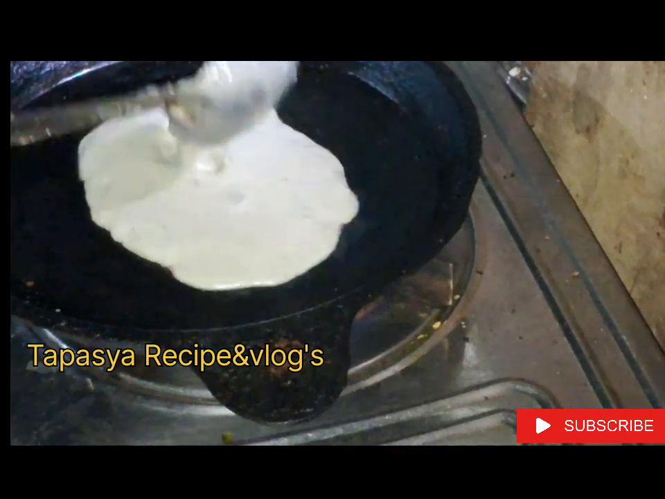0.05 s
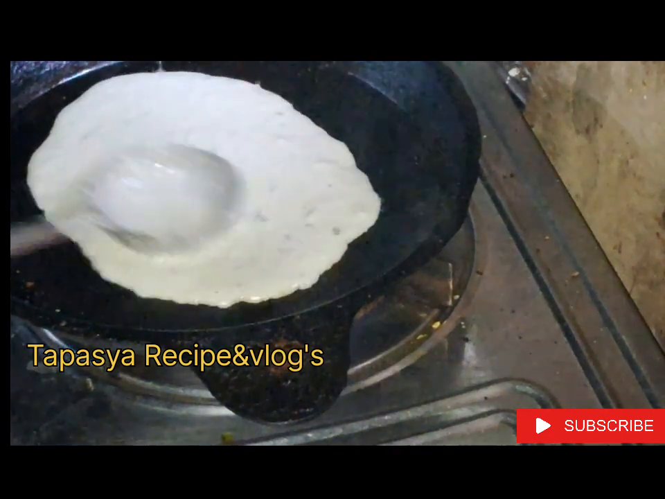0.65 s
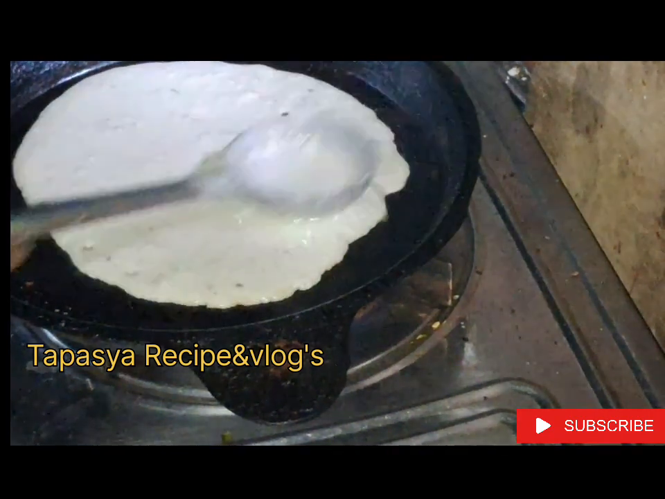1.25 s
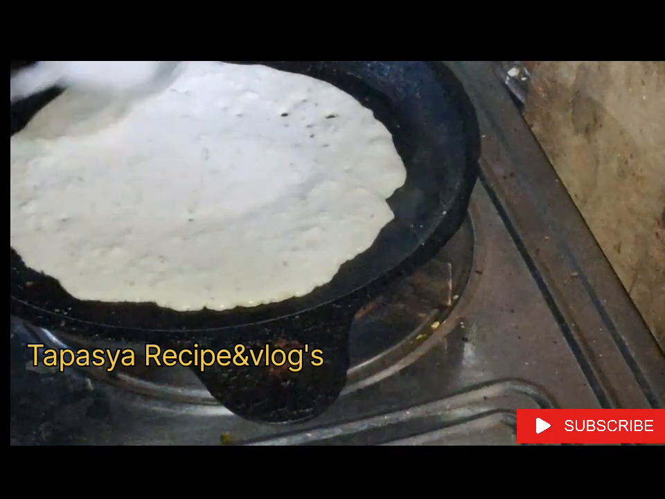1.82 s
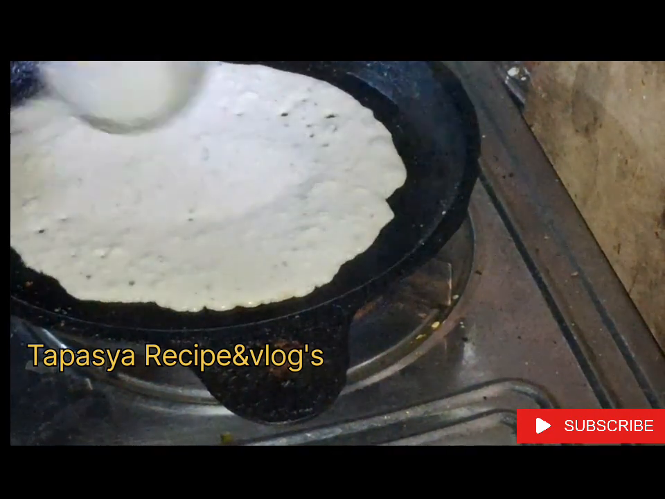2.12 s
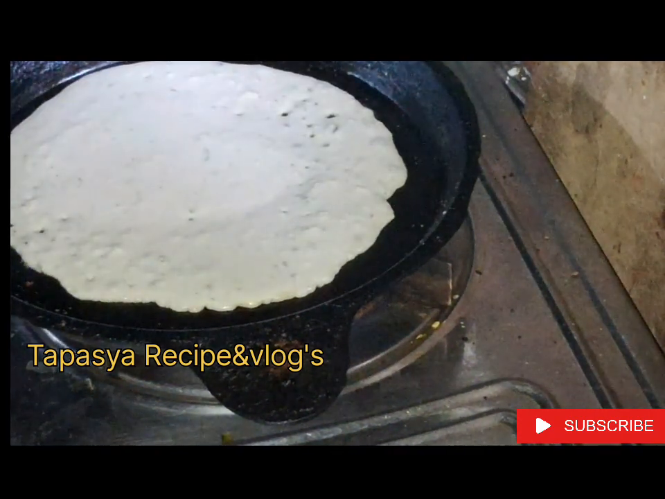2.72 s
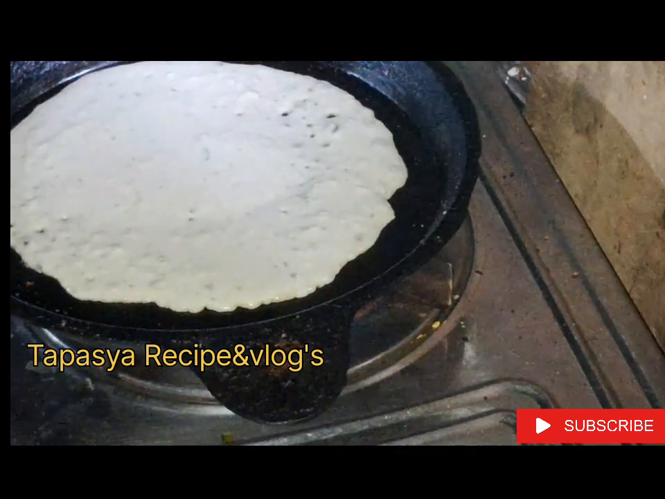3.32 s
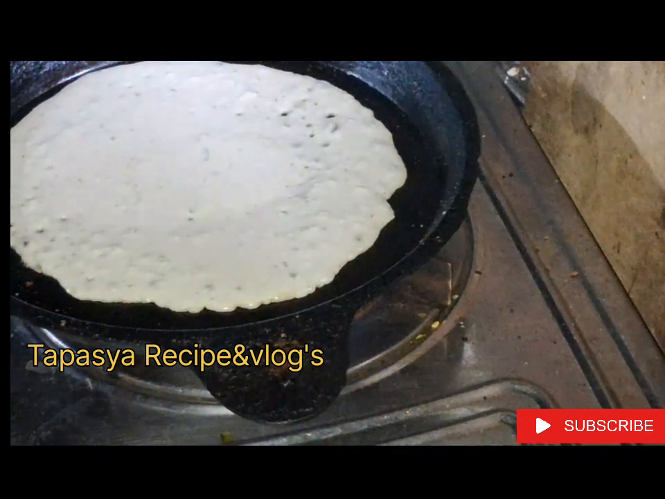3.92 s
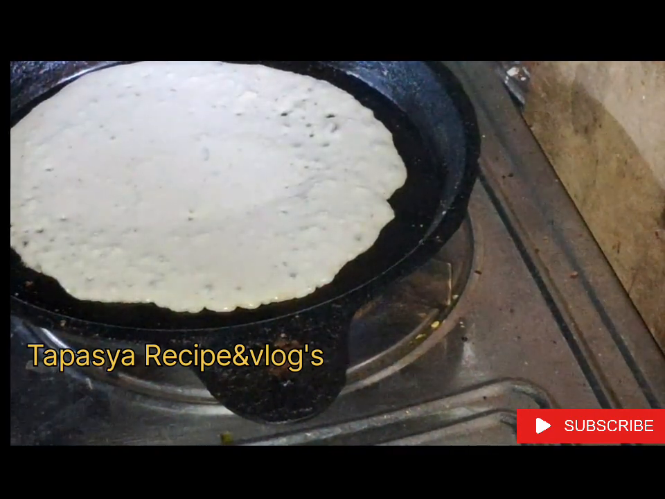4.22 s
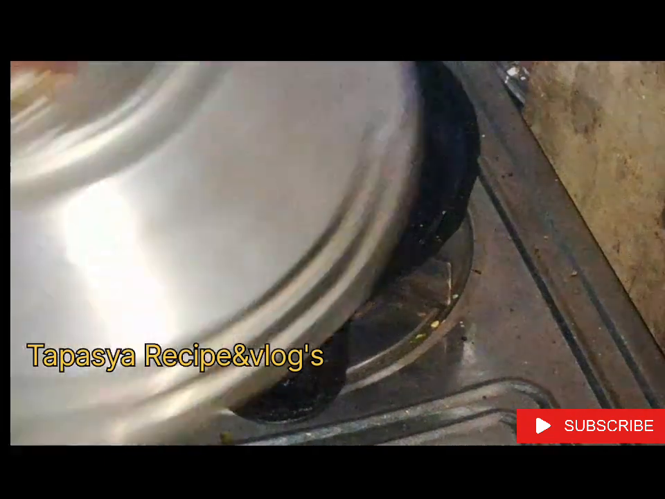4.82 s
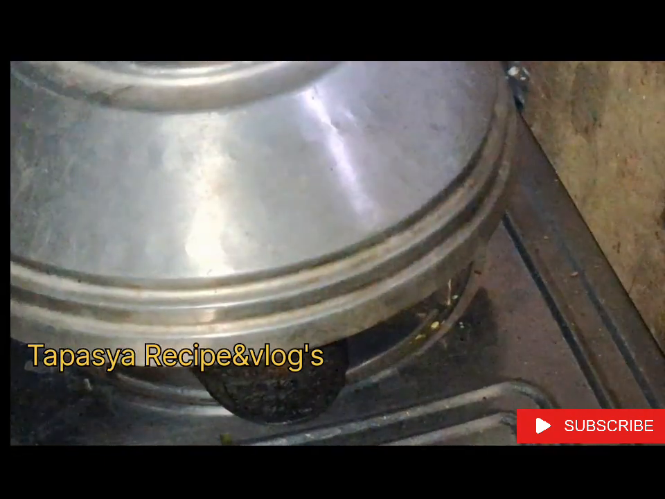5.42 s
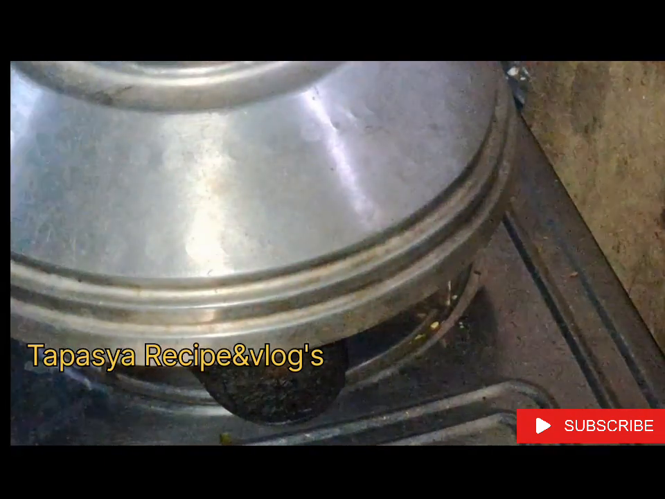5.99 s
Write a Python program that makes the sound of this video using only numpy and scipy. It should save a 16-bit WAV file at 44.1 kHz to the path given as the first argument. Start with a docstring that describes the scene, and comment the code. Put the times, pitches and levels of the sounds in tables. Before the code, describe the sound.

A fine, fizzing sizzle swells several times as batter is poured and spread on a nearby iron griddle, then gradually settles. Off to the left a ladle clinks and a steel lid booms and rattles, with a short kitchen echo. The lid comes down over the pan with a hollow knock, and the frying turns quieter and more hollow, with a few small plops.

```python
"""A small, hard-walled kitchen: batter is ladled and spread on a hot iron griddle. Each stroke wets fresh
iron, and thousands of tiny bursting bubbles fizz, spit and boil, dying down as the batter sets.
Off to the left the ladle is put down with a clink and a steel lid is picked up with a boom and a clatter.
The lid lands on the pan with a hollow knock, and the sizzle goes on, ringing in the cavity under it."""
import sys
import numpy as np
from scipy import signal
from scipy.fft import rfft, irfft, next_fast_len
from scipy.io import wavfile

SR = 44100
rng = np.random.default_rng(int(sys.argv[2]) if len(sys.argv) > 2 else 0)


def waveform_to_disk(signal):
    """Save audio, clipped to [-1, 1], as 16-bit WAV at the path in sys.argv[1]."""
    frames = np.transpose(np.atleast_2d(signal))
    scaled = np.clip(frames, -1, 1) * 32767
    samples = np.round(scaled).astype(np.int16)
    wavfile.write(sys.argv[1], SR, samples)


N = 271215
TIME = np.arange(N) / SR

# the pour, then each sweep of the ladle: (start [s], length [s], steam [dB], churning [dB])
STROKES = [(-.06, 0.33, -21, -38.5), (0.686, 0.22, -32, -42), (1.056, .13, -26, -33.5),
           (1.465, 0.15, -28, -40)]
# tone of boiling batter: (frequency [Hz], level [dB])
BUBBLING_SPECTRUM = [(40, -42), (90, -21), (130, -13), (175, -6.5), (225, -11), (330, -15.5), (400, -5),
                     (620, 0.5), (830, 1.5), (1200, 2.5), (1550, 3.5), (2300, -4.5), (3200, -10),
                     (6000, -18.5), (12000, -59)]


def amp(db):
    """Decibels to gain."""
    return 10 ** (np.asarray(db) / 20)


def unit_rms(x):
    """Scales to rms 1."""
    return x / np.sqrt(np.mean(x ** 2) + 1e-20)


def curves(rows):
    """Turns (time, values...) breakpoints into one curve per value."""
    times, *columns = np.transpose(rows)
    return [np.interp(TIME, times, column) for column in columns]


def coloured(x, spectrum):
    """Equalises a signal along a log-frequency curve, at rms 1."""
    size = next_fast_len(x.shape[-1])
    hz, db = np.transpose(spectrum)
    gain = amp(np.interp(np.log(np.fft.rfftfreq(size, 1 / SR) + 1), np.log(hz + 1), db))
    return unit_rms(irfft(rfft(x, size) * gain, size)[..., :x.shape[-1]])


def add(mix, start, sound):
    """Mixes a sound in at `start` seconds."""
    part = mix[round(start * SR):][:len(sound)]
    part += sound[:len(part)]


def resonate(x, hz, width):
    """A resonance of gain 1 that follows the curve hz."""
    turn = np.exp(2j * np.pi * np.cumsum(hz) / SR)
    pole = np.exp(-np.pi * width / SR)
    return 2 * (turn * signal.lfilter([1 - pole], [1, -pole], x / turn)).real


def room(x, early_db, late_db, early_t60=0.092, late_t60=0.46, shared_hz=330):
    """Dense echoes from the stove and near walls, then the kitchen's tail; bass is alike in both ears."""
    t = np.arange(SR * 3 // 5) / SR
    near, far = rng.standard_normal((2, 2, len(t))) * (rng.random((2, 2, len(t))) < .2)
    near = unit_rms(near * amp(-60 * t / early_t60) * (t > .001))
    far = unit_rms(far * amp(-60 * t / late_t60) * (1 - np.exp(-t / 0.0025)))
    left, right = rfft((amp(early_db) * near + amp(late_db) * far) / np.sqrt(len(t)))
    shared = 1 / (1 + (np.fft.rfftfreq(len(t), 1 / SR) / shared_hz) ** 4)
    echoes = irfft(np.array([left, shared * left + np.sqrt(1 - shared ** 2) * right]))
    return signal.oaconvolve(np.atleast_2d(x), echoes, axes=1)[:, :N]


def from_left(x, far_ear_db, lag_samples=16):
    """The right ear hears it later and weaker."""
    return np.array([x, amp(far_ear_db) * np.pad(x, (lag_samples, 0))[:N]])


def wetting(levels_db, rise_power, dry_s, fall_power):
    """Each stroke swells while it wets fresh iron, then dries off; their energies add."""
    energy = 1e-12
    for (start, length, *_), db in zip(STROKES, levels_db):
        swell = np.clip((TIME - start) / length, 0, 1) ** rise_power
        drying = np.exp(-(np.maximum(TIME - start - length, 0) / dry_s) ** fall_power)
        energy += (amp(db) * swell * drying) ** 2
    return np.sqrt(energy)


def simmering(level_db, fall_db_per_s):
    """The simmer builds with the pour and fades steadily as the batter sets."""
    start, length, *_ = STROKES[0]
    return np.clip((TIME - start) / length, 0, 1) * amp(level_db - fall_db_per_s * TIME)


def bursts(per_s, spread_db, candidates=60000):
    """Tiny bubbles burst all over the pan, each with its own size and delay between the ears."""
    out = np.zeros((2, N))
    when, side, chance, sign, size = rng.random((candidates, 5)).T
    at = (when * (N - 1)).astype(int)
    lag = np.round((side - .5) * 20).astype(int)
    size = np.sign(sign - .5) * amp(spread_db * np.minimum(-np.log(size + 1e-9), 6))
    size *= chance < per_s[at] * N / SR / candidates  # the rate decides which ones burst
    np.add.at(out[0], at, size)
    np.add.at(out[1], (at + lag) % N, size)
    return unit_rms(out / np.sqrt(per_s))


def frying(spectrum, per_s, spread_db, hiss_db):
    """Separate bursts and their echoes over a smooth hiss of steam."""
    pops = bursts(per_s, spread_db)
    pops = unit_rms(pops + room(pops, early_db=0, late_db=-1.5))
    return coloured(pops + amp(hiss_db) * rng.standard_normal((2, N)), spectrum)


def steam_level(steam_db):
    """Envelope of the fizz: strokes, simmer and flares, ducked as the lid comes between pan and ears."""
    # a wet spot flares up: (time [s], level [dB])
    flares = [(1.06, -27.5), (1.44, -25.5), (1.86, -32), (2.063, -35), (2.345, -35.5), (2.725, -35.5),
              (4.78, -47), (5.68, -44.5)]
    flaring = sum(amp(db) * np.exp(-((TIME - middle) / 0.033) ** 2) for middle, db in flares)
    stirred = wetting(steam_db, rise_power=0.39, dry_s=.7, fall_power=1.6)
    shade_db = np.interp(TIME, (4.35, 4.9), (0, -4))
    steam = np.hypot(stirred, simmering(-37.5, fall_db_per_s=.65)) * amp(shade_db)
    return np.hypot(steam, flaring)


def fizzing(per_s):
    """Steam escapes in a bright, fine fizz."""
    # its airy tone: (frequency [Hz], level [dB])
    spectrum = [(400, -33.5), (1500, -7), (3000, -5), (5000, -5), (7200, -8), (8500, -1.5), (9400, -3),
                (11000, -1), (13000, 2.5), (16000, -5)]
    return frying(spectrum, per_s, spread_db=4.0, hiss_db=0.0)


def spitting(churn_db, pressed, per_s):
    """Churned batter spits; the gap under the ladle's bowl colours it, most when pressed down."""
    # midrange bite of the spitting: (frequency [Hz], level [dB])
    spectrum = [(300, -34), (1100, -3), (1600, -14), (2150, 2.5), (2800, 1), (3300, 2), (4100, 2),
                (5400, -2.5), (7500, -4.5), (16000, -40)]
    # the gap's lowest resonance: (time [s], pitch [Hz], gain [dB])
    gap_sweep = [(.1, 2780, 8), (.35, 2700, 12.5), (.7, 1700, 11), (1.05, 1890, -2), (1.21, 2120, 5),
                 (1.31, 1520, 11.5), (1.44, 1500, 11), (1.53, 1740, 0), (1.85, 2010, 10)]
    # its resonances: (multiple of the lowest, width [Hz], gain [dB])
    gap_modes = [(1, 300, -2), (1.4, 250, -9), (2.25, 250, -21)]
    level = wetting(churn_db, rise_power=0.66, dry_s=0.48, fall_power=0.92)
    spit = level * frying(spectrum, per_s, spread_db=4.0, hiss_db=-3.5)
    gap_hz, gap_db = curves(gap_sweep)
    gap = sum(resonate(spit, ratio * gap_hz, width) * amp(db) for ratio, width, db in gap_modes)
    return spit + pressed * amp(gap_db) * gap


def sizzle():
    """Strokes stir up fizz, spitting and bubbling over a fading simmer."""
    # the ladle eases off: (middle [s], half length [s], dip [dB])
    lifts = [(1.064, 0.075, -3), (1.565, .055, -4)]
    pressed = amp(sum(db * np.exp(-((TIME - middle) / half) ** 2) for middle, half, db in lifts))
    _, _, steam_db, churn_db = np.transpose(STROKES)
    steam = steam_level(steam_db)
    churned = wetting(churn_db - 3.5, rise_power=0.58, dry_s=0.59, fall_power=0.83)
    boil = np.hypot(churned, simmering(-37, fall_db_per_s=1.94))
    per_s = 8000 * (steam / steam.max()) ** .7  # a quieter pan has fewer bursts
    fizz = steam * fizzing(per_s)
    spit = spitting(churn_db, pressed, per_s / 2)
    bubbling = pressed * boil * frying(BUBBLING_SPECTRUM, per_s / 3, spread_db=3.0, hiss_db=-12.5)
    return fizz + spit + under_lid(bubbling, boil)


def room_tone():
    """A low kitchen rumble common to both ears, and faint moving air at each."""
    # the rumble: (frequency [Hz], level [dB])
    kitchen = [(20, -37), (45, -27), (64, 12.5), (85, -16), (115, 6), (170, -37), (300, -8), (1000, -3),
               (8000, -73)]
    # moving air: (frequency [Hz], level [dB])
    draught = [(20, -29), (60, 4), (130, 4), (220, 0.5), (600, -22), (4000, -43)]
    rumble = amp(-61.0) * coloured(rng.standard_normal(N), kitchen)
    return rumble + amp(-66.0) * coloured(rng.standard_normal((2, N)), draught)


def stirring():
    """The ladle drags through the batter; at each rub the iron's faint hum swells and fades."""
    # the bowl rubs on the iron: (middle [s], length [s], level [dB])
    rubs = [(0.707, 0.92, -57.5), (1.294, 0.66, -54.5), (1.714, 0.4, -51.5), (2.363, 0.2, -62.5),
            (2.743, 0.55, -62)]
    # the iron's hum: (frequency [Hz], level [dB])
    pan_hum = [(60, -19), (170, -2.5), (220, -54), (262, 5), (310, -11.5), (420, -1.5), (900, -36),
               (4000, -60)]
    pressure = sum(amp(db) * np.cos(np.pi * np.clip((TIME - middle) / length, -.5, .5))
                   for middle, length, db in rubs)
    return pressure * coloured(rng.standard_normal(N), pan_hum)


def droplet_snaps(fall_s=0.0012):
    """A droplet bursts on the hot iron with a thin, dry tick."""
    # droplets: (time [s], level [dB])
    snaps = [(2.952, -31.5), (3.7318, -35), (4.2562, -37), (4.564, -37), (4.8019, -37), (5.5792, -40)]
    # tone of a tick: (frequency [Hz], level [dB])
    spectrum = [(1000, -25), (6000, -11), (10000, 0), (16000, -6)]
    out, t = np.zeros(N), np.arange(SR // 50) / SR
    for start, db in snaps:
        add(out, start, amp(db) * coloured(rng.standard_normal(len(t)), spectrum) * np.exp(-t / fall_s))
    return out + room(out, early_db=6, late_db=-8)


def struck(blows, modes, scuff, rise_s, held_s=1, polarity=1):
    """Each blow is a brief rough contact that sets the modes ringing; a hand damps them after held_s."""
    out, t = np.zeros(N), np.arange(SR // 2) / SR
    ring = sum(polarity ** k * amp(db - 60 * t / t60) * np.sin(2 * np.pi * hz * t)
               for k, (hz, db, t60) in enumerate(modes))
    ring /= 1 + (t / held_s) ** 10
    attack = 1 - np.exp(-t / rise_s)
    for start, scuff_db, fall_s, ring_db in blows:
        contact = coloured(rng.standard_normal(len(t)), scuff) * np.exp(-t / fall_s)
        add(out, start, (amp(scuff_db) * contact + amp(ring_db) * ring) * attack)
    return out


def ladle_clink():
    """The ladle is put down on the left with a short, bright ring."""
    # its contacts: (time [s], scuff [dB], scuff decay [s], ring [dB])
    blows = [(3.2187, -14.5, 0.0026, -20), (3.2455, -12, 0.0043, -27), (3.254, -31.5, 0.079, -48)]
    # its ring: (pitch [Hz], level [dB], t60 [s])
    modes = [(1073, -21, 0.12), (1430, -16, 0.06), (2160, -14, 0.12), (3490, -15, 0.12),
             (4690, -6.5, 0.045), (4930, -6, .06), (5130, 3, 0.028), (5160, -10, 0.036), (10300, -20, .15)]
    # contact noise: (frequency [Hz], level [dB])
    scuff = [(150, -37), (700, 3), (2200, 2.5), (3400, 2), (3850, -5), (4400, -1), (5050, 5.5), (6000, 0),
             (6700, -8), (7600, -4), (13000, -1.5), (16000, -9)]
    clink = struck(blows, modes, scuff, rise_s=0.00054)
    return from_left(clink, far_ear_db=-9.0) + room(clink, early_db=-1.5, late_db=1.0)


def lid_boom():
    """The lid's thin dome flexes slowly, giving a soft-edged boom."""
    # flexes: (time [s], scuff [dB], scuff decay [s], ring [dB])
    blows = [(3.218, -58, 0.0099, -46), (3.666, -29.5, 0.054, -18), (3.803, -58, .01, -38),
             (3.928, -55, 0.016, -40.5), (4.033, -54, .02, -43), (4.278, -62, 0.011, -56),
             (4.527, -66, .01, -52)]
    # the dome's ring: (pitch [Hz], level [dB], t60 [s])
    modes = [(115.5, 1, 0.8), (123.4, 0, 0.22), (840, -19, 0.26), (1520, -4.5, 0.085)]
    # dull thump: (frequency [Hz], level [dB])
    scuff = [(35, -38), (90, -10), (170, 8), (300, -11.5), (2000, -13.5), (16000, -53)]
    boom = struck(blows, modes, scuff, rise_s=0.012, held_s=0.12)
    return boom + room(boom, early_db=-18, late_db=-14, shared_hz=100)


def lid_clatter():
    """The steel lid rattles as it is picked up on the left."""
    # its contacts: (time [s], scuff [dB], scuff decay [s], ring [dB])
    blows = [(3.561, -27, 0.005, -49), (3.667, -30, 0.0089, -59.5), (3.7705, -19, 0.0049, -56),
             (3.7742, -6.5, 0.0037, -31), (3.7785, -18.5, 0.014, -29), (3.7925, -17, 0.0045, -27),
             (3.9275, -18, 0.0064, -35), (3.965, -33.5, 0.095, -69), (4.002, -17, 0.0036, -42),
             (4.021, -24, 0.012, -35.5), (4.278, -33, 0.0077, -71), (4.395, -33, 0.0093, -66),
             (4.4165, -21, 0.0045, -60), (4.5267, -42, 0.0043, -63)]
    # the steel's ring: (pitch [Hz], level [dB], t60 [s])
    modes = [(273.6, -14.5, 0.16), (380, -10.5, 0.11), (453.6, -9, 0.19), (534, -8, 0.1), (1360, -5, 0.061),
             (1609, 1, 0.072), (2065, -2, 0.046), (2390, 3, 0.042), (5900, -11, 0.11), (7340, -3, 0.049),
             (8700, -3, 0.075), (12040, -2, 0.071)]
    # contact noise: (frequency [Hz], level [dB])
    scuff = [(100, -6), (210, -13), (310, -24), (390, -8), (540, 1.5), (850, -0.5), (2200, 1.5),
             (4200, -1.5), (8000, 3), (10000, -0.5), (14500, 1), (16000, -6.5)]
    clatter = struck(blows, modes, scuff, rise_s=0.0004)
    return from_left(clatter, far_ear_db=-11.0) + room(clatter, early_db=-3.0, late_db=-0.5)


def under_lid(bubbling, boil, lowering_s=(4.5, 5.15)):
    """The descending lid trades the open bubbling for the deepening tones of the air under it."""
    # cavity resonances: (base pitch [Hz], width [Hz], gain [dB])
    modes = [(505, 53, 11), (1040, 130, -6), (1176, 59, 3), (1797, 55, -3), (2485, 33, 5), (3490, 110, -6),
             (4440, 180, 0), (5750, 410, 6.5)]
    # the cavity deepens: (time [s], factor on its pitch)
    deepening = [(4.6, 1.6), (4.85, 1.28), (5.0, 1.1), (5.15, 0.88), (5.4, 0.94), (6.15, 0.93)]
    bend, = curves(deepening)
    covered = np.interp(TIME, lowering_s, (0, 1))
    fat_bubbles = bursts(per_s=np.full(N, 60), spread_db=1)
    sputter = amp(-4) * boil * coloured(fat_bubbles, BUBBLING_SPECTRUM)
    cavity = sum(resonate(bubbling + sputter, hz * bend, width) * amp(db) for hz, width, db in modes)
    return amp(-13 * covered ** 1.9) * bubbling + covered ** 2.4 * cavity


def large_bubbles():
    """A large bubble is a short note that rises as its skin opens."""
    # single plops: (time [s], level [dB], starting pitch [Hz], t60 [s])
    plops = [(4.556, -36, 1060, 0.043), (4.757, -38, 780, 0.039), (5.032, -26, 1120, 0.014),
             (5.322, -37, 425, 0.059), (5.577, -35.5, 510, 0.046), (5.627, -33, 503, 0.038),
             (5.693, -38, 487, .05), (5.787, -29.5, 480, 0.048), (5.908, -44, 483, 0.033),
             (5.967, -37, 480, 0.036), (6.002, -37, 483, 0.036)]
    out, t = np.zeros(N), np.arange(SR // 8) / SR
    for start, db, hz, t60 in plops:
        swell = 1 - np.exp(-(hz * t / 2) ** 2)
        chirp = np.sin(2 * np.pi * hz * t * (1 + 0.081 * t / t60))
        add(out, start, amp(db - 60 * t / t60) * swell * chirp)
    return out + room(out, early_db=-11.0, late_db=-14)


def lid_knock():
    """The lid lands on the pan with a hollow knock and settles."""
    # landing and settling: (time [s], scuff [dB], scuff decay [s], ring [dB])
    blows = [(5.127, -32.5, 0.032, -28.5), (5.1575, -36, 0.095, -44), (5.2035, -36.5, 0.055, -45),
             (5.248, -38.5, 0.028, -53), (5.318, -57, 0.016, -62), (6.055, -58, 0.035, -50)]
    # ring of the seated lid: (pitch [Hz], level [dB], t60 [s])
    modes = [(128, -11, .25), (186, -7, .25), (258, -3.5, .85), (273, -5.5, .7), (393, -6, .25),
             (430, -10, .22), (483, -3, .13), (518, -7, .4), (926, -18, .3), (1109, -20, .35),
             (2396, -27, .25), (4750, -13, .06), (5335, -8, .08)]
    # contact noise: (frequency [Hz], level [dB])
    scuff = [(35, -28), (65, -11), (95, -5), (160, 1.5), (280, -1), (340, -6.5), (500, 2), (680, -14),
             (1100, -18), (2000, -24), (3600, -25), (5000, -17), (7000, -24), (9500, -22), (16000, -27)]
    # neighbouring modes start in opposition, so a close pair swells and throbs
    knock = struck(blows, modes, scuff, rise_s=0.0012, held_s=0.21, polarity=-1)
    return knock + room(knock, early_db=-11, late_db=-14, shared_hz=320)


def scene():
    """The pan in front, the utensils to the left."""
    cooking = sizzle() + stirring() + droplet_snaps() + large_bubbles()
    utensils = ladle_clink() + lid_boom() + lid_clatter() + lid_knock()
    return cooking + utensils + room_tone()


def record(dry, edge_hz=16080):
    """A steep low-pass trims the very top."""
    lowpass = signal.firwin(511, edge_hz, window=("kaiser", 9), fs=SR)
    return signal.oaconvolve(dry, lowpass[None], "same")


dry = scene()
out = record(dry)
waveform_to_disk(out)
```